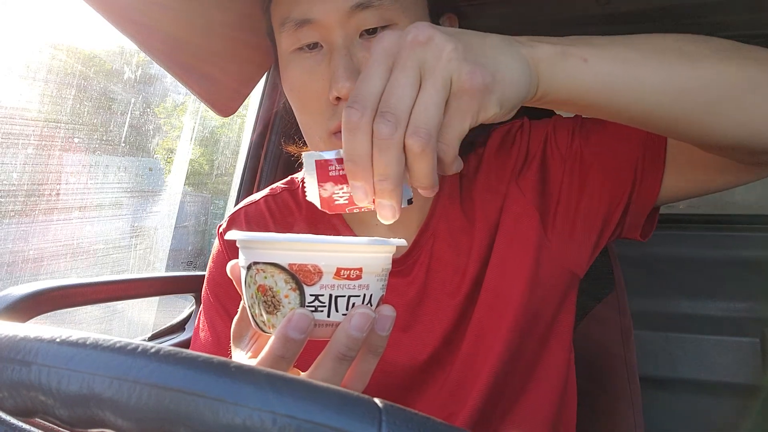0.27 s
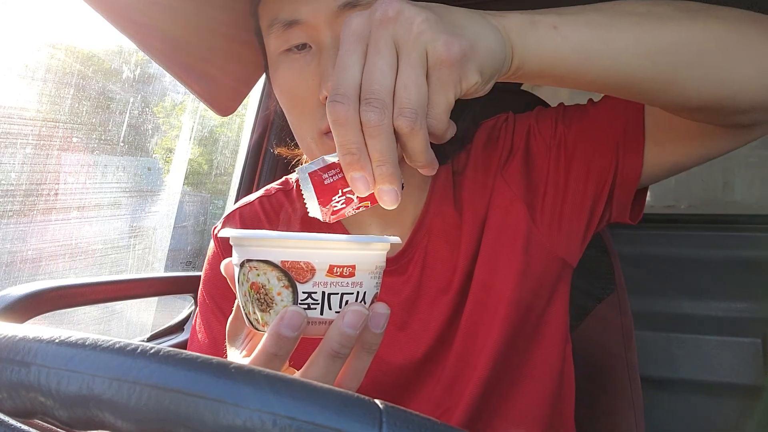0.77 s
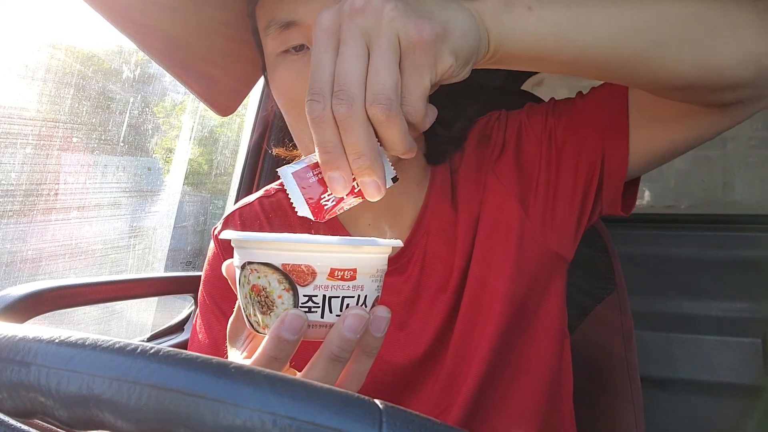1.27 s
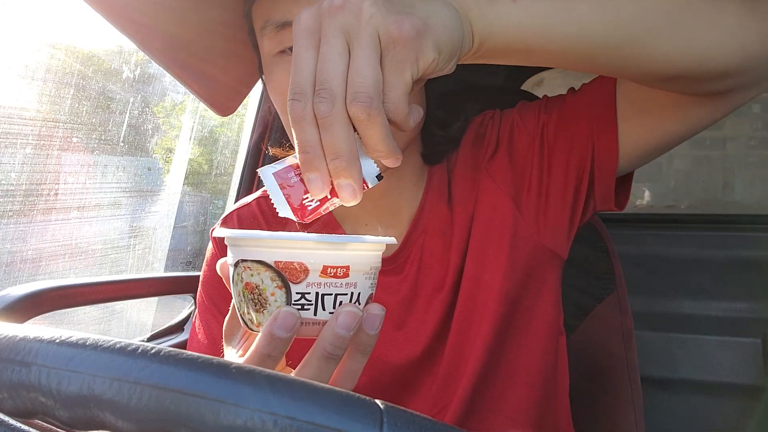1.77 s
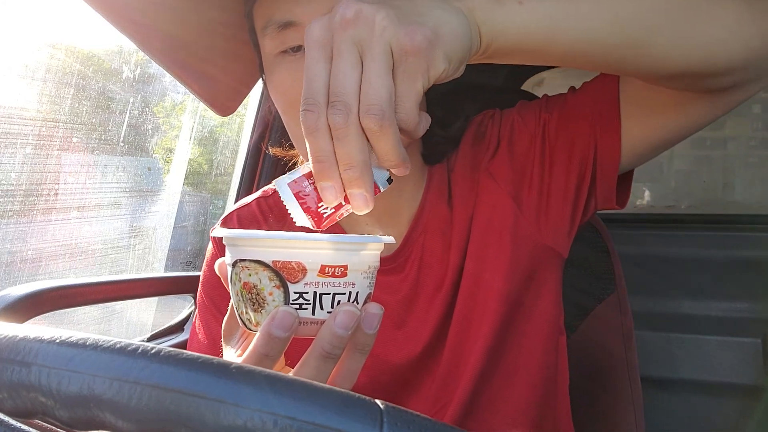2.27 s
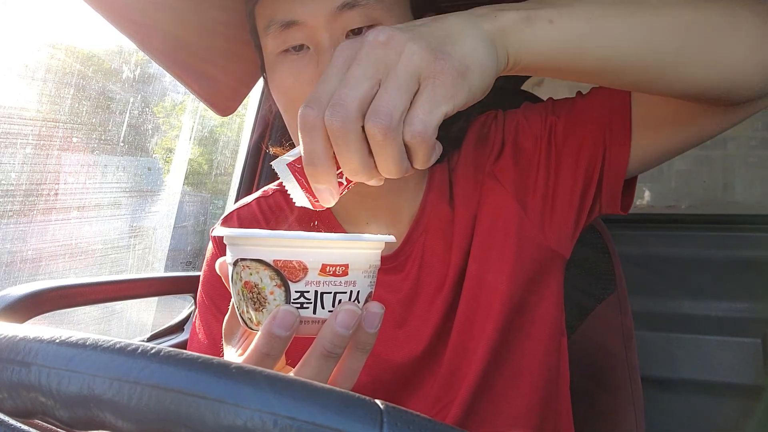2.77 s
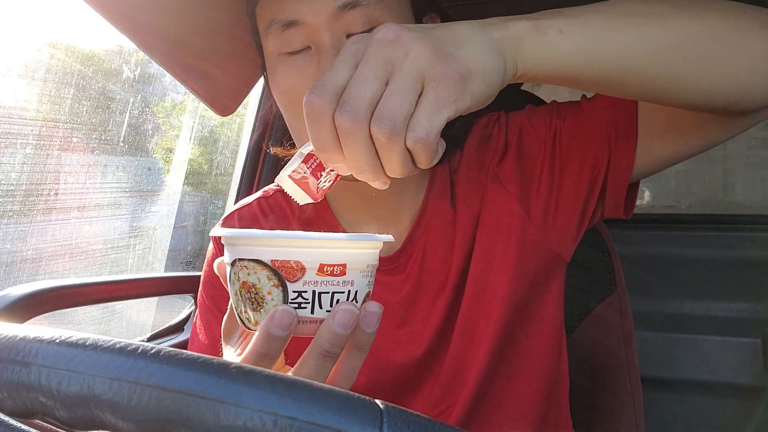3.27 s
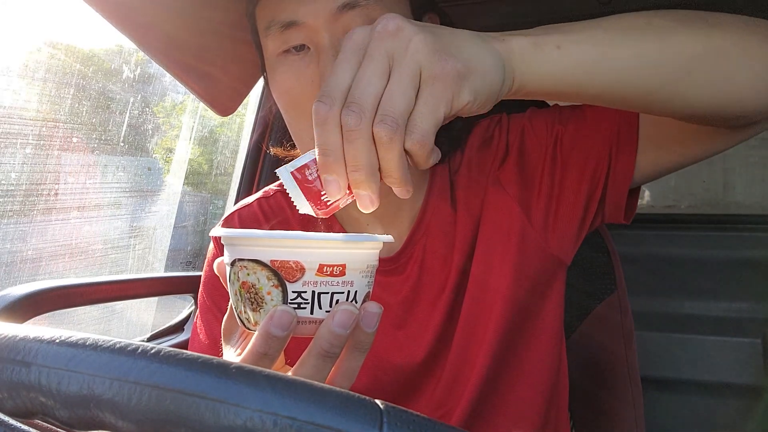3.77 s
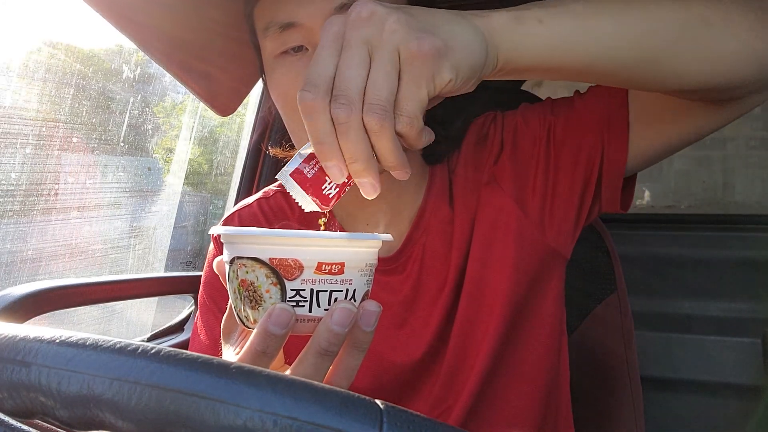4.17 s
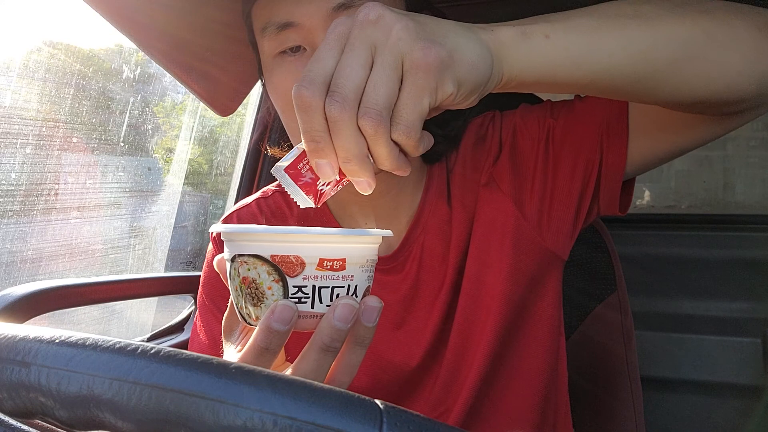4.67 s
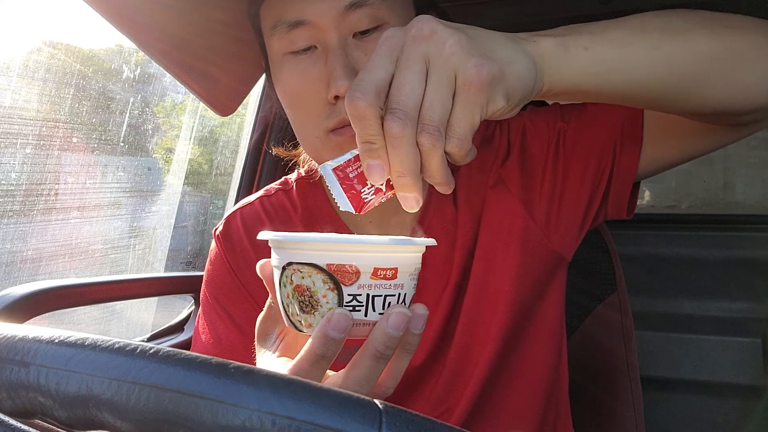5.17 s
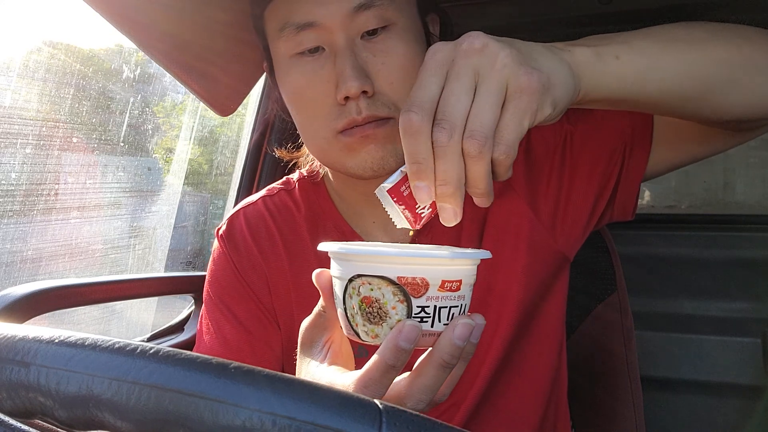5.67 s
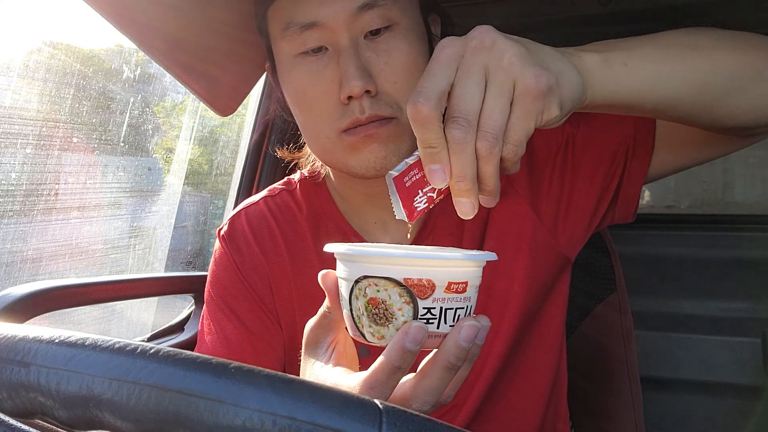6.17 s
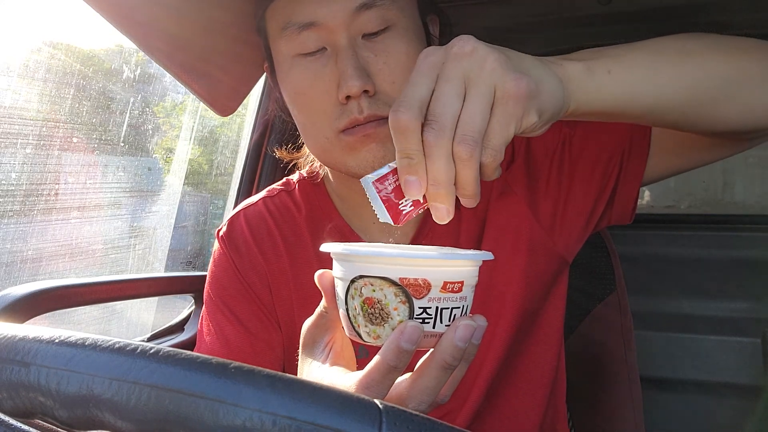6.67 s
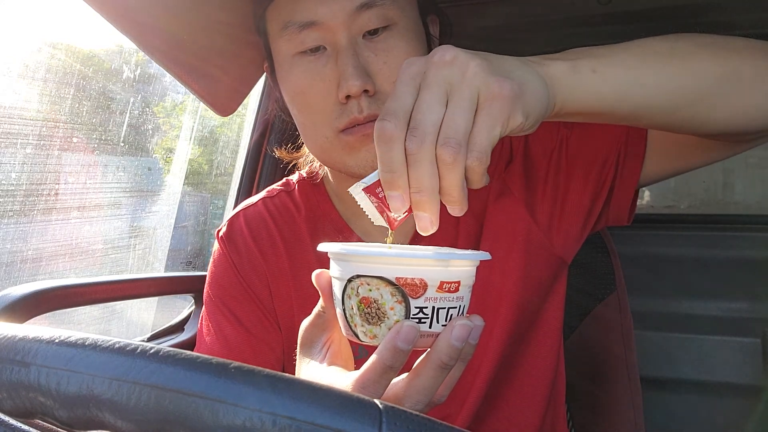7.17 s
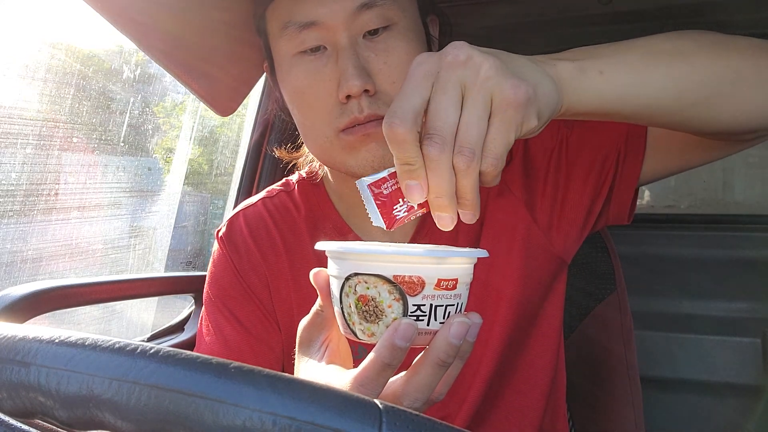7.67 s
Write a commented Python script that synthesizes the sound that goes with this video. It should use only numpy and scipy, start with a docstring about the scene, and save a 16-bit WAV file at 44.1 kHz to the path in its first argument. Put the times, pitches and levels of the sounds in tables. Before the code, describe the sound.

A small stiff plastic sachet is squeezed and flexed between the fingers, close to a stereo microphone in a small hard vehicle cab. From 0 s crisp, irregular clicks come in quick clusters, with fine rustle swelling at each squeeze; snaps stand out near 0.7, 0.9, 1.9 and 2.3 s, and a tight burst comes at 2.6 s. From about 2.7 to 4 s the crackling is sparse and softer, almost pausing around 3.2 s. It thickens again from 4.1 s, with strong snaps at 4.5, 4.9 and 5.4 s, then eases until 6 s. From 6.2 s to the end, near 8 s, the creases are loudest, sharp and frequent. Each click is bright, rings very briefly and trails smaller ticks; a few carry muted low thuds. Beneath lies a quiet, wavering engine hum around 60 Hz with soft rumble, slowly sinking, plus faint steady hiss.

```python
"""Small plastic sachets are squeezed between the fingers inside a parked vehicle cab, close to two microphones.
Each large crease is a click that rings the film, trails weaker folds and is answered by the small hard cab.
Swarms of tiny creases rustle between the snaps, rising and fading with each squeeze; low thuds lie under
some of the creases. The engine is an unsteady low tone over rumbling noise, which slowly sinks;
a faint hiss stays steady."""
import sys
import numpy as np
from scipy import signal
from scipy.fft import rfft, irfft, next_fast_len
from scipy.io import wavfile
from scipy.ndimage import uniform_filter1d, map_coordinates

SR = 44100
rng = np.random.default_rng(int(sys.argv[2]) if len(sys.argv) > 2 else 0)


def wav_record(signal):
    """Record a signal, one row per channel, as 16-bit PCM in the file named by sys.argv[1]."""
    frames = np.transpose(np.atleast_2d(signal))
    bounded = np.clip(frames, -1, 1)
    # unit amplitude maps onto the largest positive 16-bit level
    quanta = np.round(bounded * 32767).astype(np.int16)
    wavfile.write(sys.argv[1], SR, quanta)


def voltage_ratio(level):
    """Linear amplitude factor for a level in decibels (scalar or array-like)."""
    return 10 ** (np.asarray(level, float) / 20)


N = 349272  # samples in the scene
LENGTH = 6144  # samples in one crease with its lead-in and tail
LEAD = 512  # samples of lead-in: a brief noise swelling just before each click


def unit(x):
    """Scale a sound to an average strength (rms) of 1."""
    return x / np.sqrt(np.mean(x ** 2) + 1e-20)


def along(points, hz):
    """Read a curve of (pitch_hz, value) points, spaced by pitch as the ear hears it (log axis)."""
    point_hz, value = np.transpose(points)
    return np.interp(np.log(hz + 1), np.log(point_hz + 1), value)


def wobble(rate):
    """Draw a smooth random curve with this many random knots a second."""
    knots = rng.standard_normal(int(N * rate / SR) + 4)
    return map_coordinates(knots, [np.arange(N) * rate / SR])


def resonance(hz, centre_hz, width_hz):
    """The shape of a resonance: 1 at its centre, falling away on both sides."""
    return 1 / (1 + (2 * (hz - centre_hz) / width_hz) ** 2)


def rise(hz, edge_hz):
    """A gain that climbs from 0 to 1 around an edge pitch."""
    return 1 - 1 / (1 + (hz / edge_hz) ** 6)


def causal(db):
    """Turn gains in dB into a filter that starts at once, with no sound ahead of it (minimum phase)."""
    cepstrum = irfft(db * np.log(10) / 20)
    half = cepstrum.shape[-1] // 2
    cepstrum[..., 1:half] *= 2
    cepstrum[..., half + 1:] = 0
    return np.exp(rfft(cepstrum))


def coloured_noise(spectrum, alike, humps=()):
    """Stereo noise of rms 1: a shared part and an opposed part set how alike the two sides are."""
    size = next_fast_len(N)
    hz = np.fft.rfftfreq(size, 1 / SR)
    turn = np.arccos(np.clip(along(alike, hz), -1, 1)) / 2
    db = along([(0.46, -120)] + list(spectrum) + [(SR / 2, -120)], hz)
    db += sum(level_db * resonance(hz, centre_hz, width_hz) for centre_hz, width_hz, level_db in humps)
    noise = rfft(rng.standard_normal((2, size)))
    mid, side = irfft(noise * voltage_ratio(db) * [np.cos(turn), np.sin(turn)], size)[:, :N]
    return unit(np.array([mid + side, mid - side]))


# how the cab's echoes die away: dull_fade_s and bright_fade_s (time to fall 60 dB), crossover_hz
CAB_ECHO = (0.13, 0.1, 2700)


def cab(count, direct_db, lead_in_db):
    """Spectra of the cab's answers: lead-in, direct click, close bounces, uneven echoes; treble dies first."""
    t = (np.arange(LENGTH) - LEAD) / SR
    dull_s, bright_s, cross_hz = CAB_ECHO
    steady = 0.6  # walls stay put, hands move: this share of the answer's power is shared
    noise = np.sqrt(1 - steady) * rng.standard_normal((count, 2, LENGTH))
    # the shared part changes gradually from the first row to the last
    turn = np.linspace(0, np.pi, count)[:, None, None]
    first, second = rng.standard_normal((2, 2, LENGTH))
    noise += np.sqrt(steady) * (np.cos(turn) * first + np.sin(turn) * second)
    patch_db = 2.5 * rng.standard_normal((count, 1, LENGTH // 32))  # makes the echoes uneven
    noise *= voltage_ratio(patch_db).repeat(32, axis=2)
    # hand, cup and wheel answer in the first moments, more for some creases
    close = rng.uniform(1, 3.5, (count, 1, 1))
    noise *= 0.85 * (1 + close * voltage_ratio(-60 * np.abs(t) / 0.02))
    noise[:, 0, LEAD] = voltage_ratio(direct_db)
    noise[:, 1, LEAD + 3] = voltage_ratio(direct_db)  # the right microphone is farther
    # the lead-in swells up to the click; its strength varies
    lead_in = voltage_ratio(lead_in_db + 3 * rng.standard_normal((count, 1, 1)) + 60 * t / 0.05)
    dull = rfft(noise * np.where(t < 0, lead_in, voltage_ratio(-60 * t / dull_s)))
    crisp = rfft(noise * np.where(t < 0, lead_in, voltage_ratio(-60 * t / bright_s)))
    bright = rise(np.fft.rfftfreq(LENGTH, 1 / SR), cross_hz)
    return dull * (1 - bright) + crisp * bright


def crumple(count, size=7):
    """Spectra of little chains: a crease, then neighbouring folds giving way, weaker and soon after."""
    mean_delay_s, strongest_db = 0.009, -8
    delay_s = mean_delay_s * rng.exponential(size=(count, size))
    gain = voltage_ratio(strongest_db - 4 * rng.exponential(size=(count, size)))
    gain *= rng.uniform(size=(count, 1)) ** 0.5  # some creases stand nearly alone
    at = np.minimum(delay_s * SR, LENGTH // 6).astype(int)
    chain = np.zeros((count, LENGTH))
    chain[np.arange(count)[:, None], at] = gain
    chain[:, 0] = 1
    return rfft(chain / np.linalg.norm(chain, axis=1, keepdims=True))[:, None]


# broad colour of film and microphone: pitch_hz, level_db
FILM_COLOUR = [(300, -44.5), (520, -16), (800, -13.5), (1300, -3), (2000, -1), (4000, -3.5), (5200, -7),
               (7500, -9), (9000, -0.5), (15400, -5.5), (16200, -41.5)]
# resonances of the cup and dashboard near the hands, before each crease varies them:
# pitch_hz, width_hz, level_db
NEARBY_RESONANCES = [(828, 110, 11), (1614, 183, 12.5), (1917, 116, 8.5), (2202, 170, 9.5),
                     (3060, 110, 7.5), (3560, 270, 5), (4300, 140, 6.5), (6600, 2500, 9.5)]
# lean towards the left microphone: pitch_hz, left_minus_right_db
LEFT_LEAN = [(500, -3.5), (1000, 4), (2000, 1), (4000, 4), (8000, 3), (12000, 4.5)]
# ranges of the thud, body and sizzle of a crease, one row each: low_hz, high_hz
CREASE_BANDS = [(500, 1400), (1400, 2700), (8000, 15500)]


def buckles(rows, ring_db, sharpness, direct_db, lead_in_db):
    """Each crease is a click that rings its own panels of film and is answered by the cab."""
    ring_hz, *shares_db = np.transpose(rows)[:, :, None]
    hz = np.fft.rfftfreq(LENGTH, 1 / SR)
    colour = along(FILM_COLOUR, hz) + ring_db * resonance(hz, ring_hz, ring_hz / sharpness)
    # each crease wakes the nearby resonances unevenly, and the grip detunes them
    woken = rng.uniform(0.2, 1.2, (len(NEARBY_RESONANCES), len(rows), 1))
    detune = np.exp(0.025 * rng.standard_normal(woken.shape))
    for wake, shift, (centre_hz, width_hz, level_db) in zip(woken, detune, NEARBY_RESONANCES):
        colour += wake * level_db * resonance(hz, centre_hz * shift, width_hz)
    # lesser panels colour each crease
    panels = uniform_filter1d(rng.standard_normal(colour.shape), size=40, axis=1)
    colour += 3.4 * unit(uniform_filter1d(panels, size=40, axis=1))

    def band_db(low_hz, high_hz):
        """Total power of the colour between two pitches, in dB."""
        inside = (hz > low_hz) & (hz < high_hz)
        return 10 * np.log10(np.sum(voltage_ratio(2 * colour[:, inside]), axis=1, keepdims=True))

    thud_band, body_band, sizzle_band = CREASE_BANDS
    middle_db = band_db(body_band[1], sizzle_band[0])
    thud, body, sizzle = (share + middle_db - band_db(*band) for share, band in zip(shares_db, CREASE_BANDS))
    lower, upper = rise(hz, body_band[0]), rise(hz, body_band[1])
    colour += thud * (1 - lower) + body * (lower - upper) + sizzle * rise(hz, sizzle_band[0])
    colour -= middle_db - 10 * np.log10(LENGTH / 24)  # so a crease of 0 dB peaks near 1
    sides_db = colour[:, None] + along(LEFT_LEAN, hz) * np.array([[0.5], [-0.5]])
    answer = cab(count=len(rows), direct_db=direct_db, lead_in_db=lead_in_db)
    return irfft(answer * causal(sides_db) * crumple(count=len(rows)))


# squeezes of the fingers, each a swell of rustle; times below 0.02 s are played as 0.02 s:
# strongest_s, level_db, build_s and fade_s (time to change by 20 dB)
SQUEEZES = [(0.0, -41.5, .08, 0.0746), (0.268, -47.5, 0.08, 0.06), (.51, -49.5, 0.16, 0.27),
            (.9, -52.5, 0.22, 0.6), (1.566, -50.5, 0.1, 0.1), (1.8, -61.5, 0.1, 0.6),
            (2.597, -45.5, 0.19, -0.0045), (2.83, -57.5, 0.26, 0), (3.329, -63.5, 0.18, 0.4),
            (3.62, -57.5, -0.01, 2.07), (4.338, -45, 0.1, 0.1), (4.57, -55.5, -0.58, 0.16),
            (4.83, -44, -0.27, -0.17), (5.72, -61, 0.7, 0.27), (6.328, -49, 0.12, 0.18),
            (7.185, -52, 0.17, -0.05), (7.55, -59.5, 0.3, 1), (7.78, -49.5, -0.12, 0.1),
            (7.901, -53.5, 0.04, 11)]


def pressure():
    """Gain of the rustle: each squeeze builds and fades evenly in dB, over the quiet of the held film."""
    resting_db = -85.5
    t = np.arange(N) / SR
    power = voltage_ratio(2 * resting_db)
    for strongest_s, level_db, build_s, fade_s in SQUEEZES:
        pace_s = np.where(t < strongest_s, max(build_s, 0.02), max(fade_s, 0.02))
        power = power + voltage_ratio(2 * (level_db - 20 * np.abs(t - strongest_s) / pace_s))
    return np.sqrt(power)


def rustle(count, kinds=32):
    """Swarms of tiny creases of a few dozen kinds, as strong as the fingers press."""
    draw = rng.standard_normal((kinds, 4))
    ring_hz = np.clip(3600 * np.exp(0.404 * draw[:, :1]), 900, 12000)
    shares_db = [-19, -9, -14] + 5 * draw[:, 1:]  # thud, body, sizzle
    rows = np.hstack([ring_hz, shares_db])
    sound = buckles(rows, ring_db=10, sharpness=5, direct_db=23, lead_in_db=-25)
    clicks = np.zeros((kinds, 1, N))
    clump = voltage_ratio(4 * wobble(30))  # neighbouring creases grow strong or weak together
    at = rng.integers(N, size=count)
    clicks[rng.integers(kinds, size=count), 0, at] = clump[at] * voltage_ratio(2.8 * rng.exponential(size=count))
    # play each kind's sound at all its clicks (convolution)
    size = next_fast_len(N + LENGTH)
    spectrum = sum(rfft(click, size) * rfft(kind, size) for click, kind in zip(clicks, sound))
    swarm = irfft(spectrum, size)[:, LEAD:LEAD + N]
    return pressure() * unit(swarm)


# engine tone, around which pitch and level waver: pitch_hz, level_db
ENGINE_TONE = (63.5, -62)
# colour of the rumble, only its shape counts: pitch_hz, relative_level_db
RUMBLE_COLOUR = [(8.8, -20), (15, -1.5), (43, -2), (70, -3), (88, -10), (182, -24.5), (324, -23),
                 (427, -37), (480, -39.5), (620, -69), (1060, -120)]
# likeness of left and right in the rumble: pitch_hz, likeness (1 = the same)
RUMBLE_LIKENESS = [(60, 0.91), (130, 0.83), (300, 0.78), (600, 0.18)]
# soft humps in the rumble's colour: pitch_hz, width_hz, height_db
RUMBLE_HUMPS = [(89.8, 3.1, 12.5), (140.3, 12, 4), (351, 25, 4)]


def engine():
    """A slightly unsteady low tone over rumbling noise that wavers and slowly sinks."""
    middle_db, sink_db_per_s = -59, 0.32
    tone_hz, tone_db = ENGINE_TONE
    phase = 2 * np.pi * np.cumsum(tone_hz * (1 + 0.0038 * wobble(3.38))) / SR
    tone = np.sqrt(2) * voltage_ratio(tone_db + 1.5 * wobble(4)) * np.sin(phase)
    from_middle_s = (np.arange(N) - N / 2) / SR
    rumble_db = middle_db + 1.8 * wobble(3) - sink_db_per_s * from_middle_s
    rumble = voltage_ratio(rumble_db) * coloured_noise(RUMBLE_COLOUR, RUMBLE_LIKENESS, RUMBLE_HUMPS)
    return (tone + rumble) * voltage_ratio([[0.3], [-0.3]])  # a touch louder on the left


# colour of the hiss, only its shape counts: pitch_hz, relative_level_db
HISS_COLOUR = [(300, -55), (500, 1.5), (1000, 1.5), (3000, -29), (8000, -8), (15500, -12), (16600, -67)]


def hiss():
    """The faint steady floor of air and electronics: noise nearly unrelated between the sides."""
    return voltage_ratio(-79.5) * coloured_noise(HISS_COLOUR, alike=[(1000, 0.0185)])


# large creases: start_s, level_db, ring_hz, body_db, sizzle_db
# (body and sizzle are relative to the film's 2.7-8 kHz band)
LARGE_CREASES = [(0.0196, -33.5, 4060, -7, -2.5), (0.05, -40, 3220, -6, -9), (0.2177, -40, 3200, -8, -4),
                 (0.2344, -32.5, 3900, -22, -24), (0.261, -36, 3950, -22, -6.5),
                 (0.286, -31.5, 3800, -4.5, -1.5), (0.3991, -33, 6000, -5, -4),
                 (0.4497, -45.5, 4070, -18, -22), (0.4965, -48.5, 3630, -3, -14),
                 (0.52, -42, 3630, -19, -21), (0.538, -36.5, 3390, -22, -30),
                 (0.557, -39.5, 4040, -30, -17), (0.6078, -37.5, 3160, -4.5, -11),
                 (0.6416, -40, 3330, -4.5, -26), (0.682, -28, 6000, -9, 2), (0.7214, -33, 6240, -11.5, -13),
                 (0.7374, -42, 5240, -14, 1.5), (0.822, -43.5, 3980, -2.5, -11),
                 (0.843, -37, 5800, -10, -6), (0.8715, -37, 3460, -15, -3), (0.8959, -28.5, 3680, -9.5, -6),
                 (0.9262, -30, 3200, -7, -5), (0.9885, -39, 3080, -4, -6), (1.004, -30.5, 4320, -18, -9),
                 (1.0172, -32.5, 4370, -25, -9), (1.053, -46.5, 4930, -2, -6),
                 (1.0647, -45.5, 3300, 1, -26), (1.115, -38, 3200, -10, -15), (1.1236, -37, 4250, -8.5, 3),
                 (1.1312, -35, 6400, -32, -19), (1.2268, -32, 6700, -9.5, 1),
                 (1.2483, -37.5, 3380, -8.5, -13), (1.31, -41, 3230, -25, -13),
                 (1.349, -49, 4000, -14, -11), (1.392, -32.5, 3230, -19, -11.5),
                 (1.4686, -41.5, 3480, -24.5, -21), (1.4863, -43, 3530, -11, -8),
                 (1.519, -36.5, 3200, -12, -9.5), (1.537, -42, 3300, -11, -13),
                 (1.57, -33.5, 3300, -6, 3.5), (1.652, -38.5, 4600, -17, -21),
                 (1.6787, -37.5, 3270, -13.5, -20), (1.755, -42, 4020, -13.5, 0.5),
                 (1.799, -38.5, 4200, -26, -19), (1.853, -44, 3300, -19, -4), (1.939, -25, 3400, -22, -13),
                 (1.9829, -46.5, 3300, -5.5, -8), (2.0557, -42, 6160, -18, -6.5),
                 (2.0794, -28, 3080, -10, -5.5), (2.1406, -32, 6300, -11.5, -10),
                 (2.234, -37.5, 3550, -7.5, -1), (2.259, -37.5, 3740, -1, -14),
                 (2.285, -33, 3400, -16, -23), (2.3042, -34.5, 3500, -16, -9),
                 (2.3108, -27, 3200, -16, -13), (2.316, -35.5, 3360, -11, -9),
                 (2.3555, -45, 3600, -15, -18), (2.374, -41.5, 3740, -9, -13),
                 (2.409, -32.5, 3560, -1.5, -7.5), (2.4536, -47, 3600, -12, -32),
                 (2.4825, -48, 3130, -21, -31), (2.532, -55, 3350, -16, 8), (2.567, -34, 4450, -43, -14),
                 (2.586, -29, 3130, -28, -7.5), (2.602, -32.5, 3240, -7, -7), (2.611, -35, 3540, -7.5, -10),
                 (2.7438, -34, 3200, -14.5, -8), (2.792, -43, 3320, -2.5, -5),
                 (2.8074, -44.5, 3100, -9, -3), (2.8593, -46, 3220, -8, -5.5),
                 (2.9271, -42, 3580, -4, -4.5), (3.009, -37, 3350, -17.5, -15),
                 (3.0622, -40, 3060, -13.5, -5), (3.333, -53, 3270, -9.5, -25),
                 (3.379, -53.5, 6910, -30, 5), (3.532, -32, 6500, -12.5, -7),
                 (3.617, -36, 3740, -1.5, -3.5), (3.676, -40, 6750, -24, -4.5),
                 (3.7357, -44, 5450, -20.5, -8), (3.786, -36, 3160, -9.5, -10),
                 (3.8592, -43.5, 3700, -10.5, -11.5), (3.998, -39, 2960, -10.5, -4),
                 (4.034, -46.5, 3840, -9, -21), (4.0874, -30, 6430, -5, -2.5),
                 (4.125, -27.5, 3450, -20, -7.5), (4.154, -32.5, 3560, -12.5, -12),
                 (4.248, -50.5, 3240, -3.5, -24), (4.301, -31, 3350, -10, -9.5),
                 (4.308, -29.5, 3350, -18, -8.5), (4.323, -29, 3300, -23, -32),
                 (4.345, -37.5, 3620, -14, -17), (4.355, -30, 4200, -12.5, -4.5),
                 (4.3811, -32, 3560, -11, -12.5), (4.411, -36.5, 4430, -26, -4.5),
                 (4.461, -41, 4200, -61, -20), (4.5425, -24, 3520, -7.5, -6.5),
                 (4.575, -30.5, 5360, -19.5, -4), (4.6183, -40, 4310, -28, -3),
                 (4.6354, -35.5, 3570, -13.5, -35), (4.707, -35.5, 3280, -12, -12),
                 (4.729, -31.5, 2920, -16, -17.5), (4.764, -50, 3480, -0.5, -8),
                 (4.791, -47, 3400, -5, -16), (4.7998, -36, 3420, -14, -6), (4.8225, -35, 3120, -16, -7.5),
                 (4.8445, -36.5, 5230, -10, -6.5), (4.8944, -35.5, 3240, -13, 0.5),
                 (4.909, -24.5, 3240, -17, -9.5), (4.977, -32, 4460, -9, 1), (5.04, -33, 7060, -17, -10),
                 (5.0905, -48, 6650, -4, 4.5), (5.114, -36.5, 4300, -14.5, -15),
                 (5.192, -54.5, 3870, -8, -12), (5.2154, -29, 3880, -13.5, -12),
                 (5.2586, -34, 4300, -9.5, -25), (5.3195, -46, 3500, -7, -62),
                 (5.349, -39.5, 3700, -9.5, -21), (5.3582, -24.5, 3650, -24, -24),
                 (5.3702, -24.5, 4160, -11, -7.5), (5.4, -34, 3570, -7, -2.5),
                 (5.4137, -31, 4060, -12.5, -5), (5.5, -40, 4030, -11.5, -22),
                 (5.5495, -45.5, 5660, -23, -5), (5.5586, -44, 4290, -11.5, -32),
                 (5.6203, -36.5, 5860, -20, -6), (5.6337, -45, 5900, -2.5, -23),
                 (5.702, -46, 3950, -23, -14), (5.724, -38, 4270, -5.5, -8.5),
                 (5.7439, -33, 4230, -11, -18), (5.8363, -33.5, 3940, -32, -59),
                 (5.8653, -42.5, 4130, -11, -14.5), (5.9814, -36.5, 4300, -7, -5),
                 (6.0071, -36, 3530, -9, -5), (6.055, -44, 3560, -16, -6), (6.151, -30.5, 3700, -15.5, -30),
                 (6.181, -30, 3760, -17, -19), (6.2014, -38.5, 4400, -17, -2),
                 (6.233, -22, 5250, -22, -12.5), (6.266, -22, 3850, -23, -58),
                 (6.3132, -31.5, 4340, -6, -8), (6.3347, -29, 4300, -6.5, -10),
                 (6.41, -30, 3830, -21, -14.5), (6.439, -31, 2830, -17.5, -10.5),
                 (6.479, -39.5, 4020, -24, -25), (6.513, -27, 4130, -16.5, -8.5),
                 (6.592, -47.5, 6500, -8, -2), (6.614, -31.5, 3640, -12, -14.5),
                 (6.626, -22.5, 3700, -16.5, -8.5), (6.6714, -20.5, 4650, -17, -12),
                 (6.7434, -39, 4060, -14.5, -11), (6.7549, -30.5, 4350, -20, -6),
                 (6.8553, -50, 4320, -3, -17), (6.873, -34.5, 4230, -19, -15.5),
                 (6.903, -20, 4300, -23.5, -19), (6.9348, -31, 4360, -12, -18),
                 (6.9498, -24, 3980, -11.5, -13.5), (7.004, -34.5, 4830, -25, -19),
                 (7.0392, -36.5, 3560, -5, -11.5), (7.0893, -33.5, 3800, -14, -4.5),
                 (7.1236, -27.5, 4580, -8, -7), (7.1648, -31.5, 3900, -19, -28),
                 (7.1748, -26, 4400, -10, -13), (7.2055, -35, 4940, -13, -12.5),
                 (7.253, -32.5, 2980, -13, -17), (7.2632, -31.5, 2830, -11.5, -10.5),
                 (7.294, -41.5, 3970, -10, -20), (7.337, -35.5, 4500, -22, -11),
                 (7.4665, -39, 4670, -11, -12), (7.4929, -50.5, 4300, 0, -10),
                 (7.528, -36.5, 4930, -10.5, -8), (7.5552, -28, 3330, -15, -13.5),
                 (7.5675, -29, 4250, -11.5, -16), (7.6945, -26, 4300, -8, 0.5),
                 (7.732, -32.5, 4300, -11, -10), (7.754, -22, 4300, -19.5, -17.5),
                 (7.7877, -24.5, 4030, -15, -16), (7.796, -25.5, 3120, -7, -27),
                 (7.8354, -33, 4200, -9, -6.5), (7.8487, -37, 4030, -12, -2.5),
                 (7.898, -33.5, 4500, -32, -14.5)]


def snaps():
    """The large creases, each heard once: the film buckles with a sharp click and a short ring."""
    start_s, level_db, ring_hz, body_db, sizzle_db = np.transpose(LARGE_CREASES)
    # the thud follows the body but grows less than the snap: about 10 dB under the body for a -35 dB snap
    thud_db = body_db - 10 - 0.26 * (level_db + 35) + 4 * rng.standard_normal(len(start_s))
    rows = np.transpose([ring_hz, thud_db, body_db, sizzle_db])
    sound = buckles(rows, ring_db=8.5, sharpness=7.5, direct_db=22, lead_in_db=-17)
    sound *= voltage_ratio(level_db)[:, None, None]
    start = np.round(start_s[:, None] * SR).astype(int)
    where = (start + np.arange(LENGTH)).ravel()
    # add up the creases; dropping LEAD samples puts each click, not its lead-in, at start_s
    sides = [np.bincount(where, sound[:, side].ravel(), N + LENGTH)[LEAD:][:N] for side in (0, 1)]
    return np.array(sides)


# low thuds under some of the creases: start_s, level_db, pitch_hz (centre of a blurred pitch)
CREASE_THUDS = [(0.283, -50, 306), (1.569, -56.5, 655), (2.6, -58, 726), (2.927, -51, 800),
                (4.54, -48, 674), (5.4, -58, 656), (7.836, -52.5, 793)]


def thuds():
    """Low thuds under some of the creases: ten close tones blur the pitch, rise fast and die away."""
    fade_s, rise_s = 0.057, 0.0018  # time to fall 60 dB, time constant of the rise
    out, t = np.zeros(N + SR), np.arange(SR // 8) / SR
    for start_s, level_db, pitch_hz in CREASE_THUDS:
        tones_hz = pitch_hz * np.exp(0.237 * rng.standard_normal((10, 1)))
        ring = np.sin(2 * np.pi * tones_hz * t).sum(axis=0) / 3
        thud = voltage_ratio(level_db - 60 * t / fade_s) * ring * (1 - np.exp(-t / rise_s))
        out[round(start_s * SR):][:len(t)] += thud
    return out[:N]


def scene():
    """Add up the creases, the engine and the faint floor."""
    return snaps() + rustle(count=2000) + thuds() + engine() + hiss()


def band_limit(x):
    """A steep low-pass at the top of the band."""
    return signal.sosfilt(signal.butter(12, 16830, fs=SR, output="sos"), x)


def record(dry):
    """Turn the finished mix into the sound that is saved."""
    return band_limit(dry)


dry = scene()
out = record(dry)
wav_record(out)
```